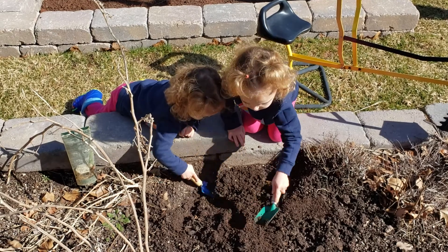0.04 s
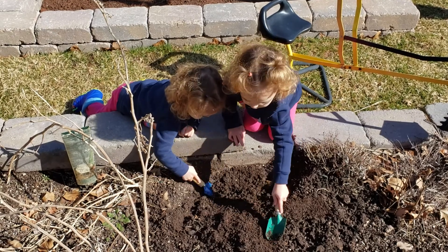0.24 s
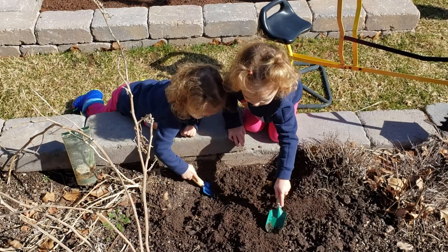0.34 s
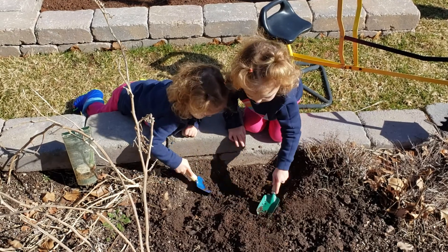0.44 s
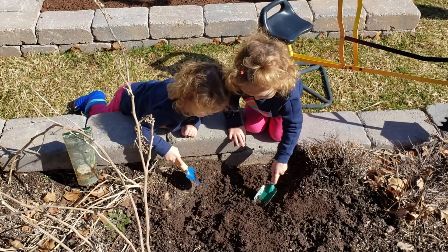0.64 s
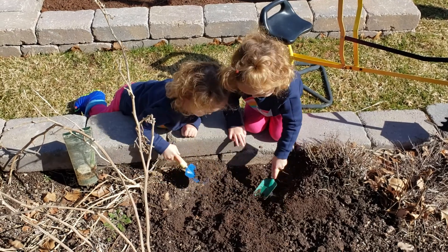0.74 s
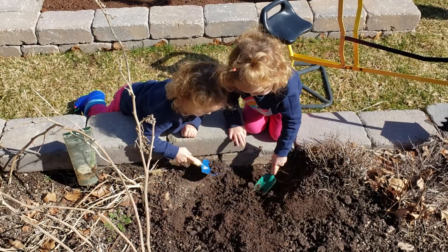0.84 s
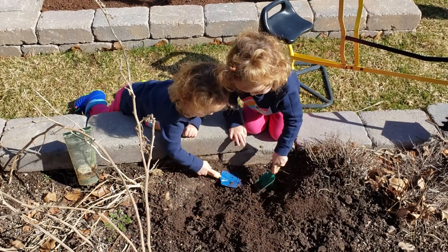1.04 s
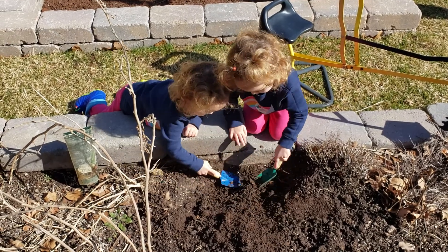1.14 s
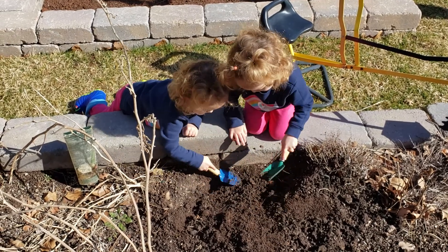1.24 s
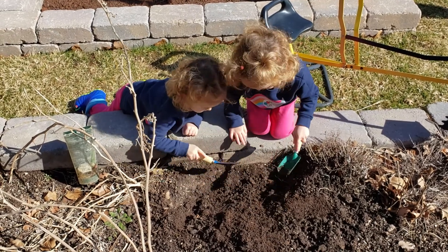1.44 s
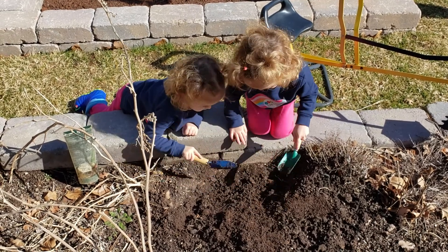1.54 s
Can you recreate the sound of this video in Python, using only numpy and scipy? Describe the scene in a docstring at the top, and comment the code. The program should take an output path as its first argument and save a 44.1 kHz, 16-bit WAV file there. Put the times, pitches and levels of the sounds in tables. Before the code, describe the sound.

In a garden bed, wind rumbles on the microphone and dry stalks hiss. Soil rustles softly, then a little trowel catches a stone with one brief click and skid as the hiss dies down.

```python
"""A garden bed on a breezy day. From the start: an outdoor wash, a faint hum, hissing dry stalks,
and wind buffeting each of two microphone ports on its own. Dry soil rustles at 0.1 and 0.4 s, eddies
slap the ports from 0.3 s on, and two crumbs drop near 0.5 s. Just before 1 s a small trowel catches
a stone: a tick, then a short skid. Meanwhile the hiss dies down with the breeze."""
import sys
import numpy as np
from scipy import signal
from scipy.fft import rfft, irfft
from scipy.io import wavfile
from scipy.ndimage import uniform_filter1d

SR = 44100
rng = np.random.default_rng(int(sys.argv[2]) if len(sys.argv) > 2 else 0)


def materialize(psi):
    """Save the field psi as 16-bit PCM at rate SR to the path in sys.argv[1].

    A 1-D psi becomes a single channel; in a 2-D psi each row is a channel.
    """
    bounded = np.clip(np.atleast_2d(psi).T, -1, 1)
    quanta = np.round(bounded * 32767).astype(np.int16)
    wavfile.write(sys.argv[1], SR, quanta)


N = 70560
TIME_S, FREQ_HZ = np.arange(N) / SR, np.fft.rfftfreq(N, 1 / SR)


def undb(db):
    """Decibels to gain."""
    return 10 ** (np.asarray(db) / 20)


def curve(points):
    """Gain over time from rows of t/s, level/dB."""
    return undb(np.interp(TIME_S, *np.array(points).T))


def colour(x, points, channel=0):
    """Filter by rows of f/Hz, level/dB; unit white noise comes out at that level per Hz."""
    rows = np.array(points, float)
    db = np.interp(np.log(np.maximum(FREQ_HZ, 1)), np.log(rows[:, 0]), rows[:, 1 + channel])
    return irfft(rfft(x) * undb(db), N) * np.sqrt(SR / 2)


def unit(x):
    """Scale to rms 1."""
    return x / np.sqrt(np.mean(x ** 2))


def noise(points):
    """Coloured noise, unrelated left and right."""
    return colour(rng.standard_normal((2, N)), points)


def decay(t, t60_s):
    """Exponential decay from time zero, silent before it."""
    return (t >= 0) * np.exp(-np.log(1000) * np.maximum(t, 0) / t60_s)


def pan(db):
    """Channel gains for a left-minus-right (L-R) level."""
    return undb(np.array([[db], [-db]]) / 2)


# Arrival at the ports: f/Hz, left lag/s, diffuse power share/0-1
PORT_ARRIVAL = [(594, 0.00038, 0.02), (1106, .00044, 0.01), (2050, 0.00049, 0.09), (6500, 0.00049, 0.3),
                (8800, 0.000534, 1)]

def far_noise(spectrum):
    """Sound from the side reaches the left port late; its treble comes from all around."""
    common, left, right = rng.standard_normal((3, N))
    hz, lags_s, shares = np.array(PORT_ARRIVAL).T
    lag_s, share = np.interp(FREQ_HZ, hz, lags_s), np.interp(FREQ_HZ, hz, shares)
    late = irfft(rfft(common) * np.exp(-2j * np.pi * FREQ_HZ * lag_s), N)
    direct, diffuse = rfft([late, common]), rfft([left, right])
    ports = irfft(np.sqrt(1 - share) * direct + np.sqrt(share) * diffuse, N)
    return np.array([colour(ports[c], spectrum, channel=c) for c in range(2)])


# Wash spectrum: f/Hz, left/(dB per Hz), right/(dB per Hz)
WASH_SPECTRUM = [(101, -103.5, -75.5), (290, -75.5, -89), (480, -86, -83.5), (577, -79.5, -75),
                 (770, -75.5, -81), (1074, -78.5, -75.5), (1240, -81, -91.5), (1570, -79, -77),
                 (1750, -82.5, -93), (1930, -75.5, -78.5), (2260, -81, -80), (2590, -80.5, -81.5),
                 (3890, -110.5, -91.5), (5400, -101, -102), (7340, -115.5, -99), (8760, -108, -110),
                 (12300, -106, -106), (15400, -114, -112)]
# Wash drift: t/s, gain/dB
WASH_GAIN = [(0, 1.5), (.7, 1), (1.0, -2), (1.2, -3), (1.45, -1), (1.6, -2)]

def wash():
    """Distant outdoor noise, nearly steady."""
    return far_noise(WASH_SPECTRUM) * curve(WASH_GAIN)


def hum(centre_hz=342.1, width_hz=37, level_db=-56.5):
    """A faint narrow band of noise, to the right."""
    peak = 1 / (1 + (2 * (FREQ_HZ - centre_hz) / width_hz) ** 2)
    band = irfft(rfft(rng.standard_normal(N)) * peak, N)
    return undb(level_db) * unit(band) * pan(-10.5)


# Stalk hiss spectrum: f/Hz, left/(dB per Hz), right/(dB per Hz)
STALK_SPECTRUM = [(900, -85.5, -82), (1930, -76.5, -81), (2860, -84, -117), (4120, -80, -90.5),
                  (5500, -88, -101), (6880, -88, -115), (8300, -105, -111), (15300, -112, -112)]
# Stalk hiss envelope: t/s, gain/dB
STALK_GAIN = [(0, -1), (.4, -3), (.78, -3), (.95, -6.5), (1.15, -10.5), (1.6, -10)]

def stalks():
    """Dry stalks hiss, dying down with the breeze."""
    return far_noise(STALK_SPECTRUM) * curve(STALK_GAIN)


# Rumble spectrum: f/Hz, relative level/dB
RUMBLE_SPECTRUM = [(15, -56), (35, -13), (60, 1), (95, -2), (130, -7), (175, -17), (240, -21), (340, -27.5),
                   (480, -36), (1000, -73)]
# Wind at the left port: t/s, level/dB
LEFT_GUSTS = [(0, -43), (.3, -44.5), (.5, -41.5), (.55, -29), (.67, -44), (.8, -32.5), (.95, -39.5),
              (1.03, -23.5), (1.08, -36), (1.12, -26.5), (1.22, -32.5), (1.325, -26.5), (1.365, -54.5),
              (1.52, -35), (1.6, -42.5)]
# Wind at the right port: t/s, level/dB
RIGHT_GUSTS = [(0, -39.5), (.17, -38), (.22, -25.5), (.27, -39), (0.309, -27.5), (.39, -31.5), (.47, -39),
               (0.591, -27.5), (.7, -46.5), (0.808, -21.5), (.86, -31), (.92, -28.5), (1.04, -27),
               (1.08, -36.5), (1.33, -47), (1.45, -36), (1.6, -39.5)]

def wind():
    """Turbulent rumble, unrelated at the two ports, evened out and then shaped into gusts."""
    rumble = unit(noise(RUMBLE_SPECTRUM))
    local_power = uniform_filter1d(rumble ** 2, size=2200)
    even = rumble / np.sqrt(local_power + 0.022)
    return even * np.array([curve(LEFT_GUSTS), curve(RIGHT_GUSTS)])


# Rustle swells: t/s, half length/s, gain/dB
SOIL_SWELLS = [(.09, 0.096, 2), (.39, 0.028, -2)]
# Rustle spectrum: f/Hz, level/(dB per Hz)
SOIL_SPECTRUM = [(4000, -108), (9000, -100), (12500, -99.5), (16000, -100)]

def soil_rustles(grain_s=0.0015, spread_db=3):
    """Dry soil rustles in brief swells of fine, grainy noise."""
    swells = sum(undb(db) * np.exp(-((TIME_S - at_s) / half_s) ** 2) for at_s, half_s, db in SOIL_SWELLS)
    grains = undb(spread_db * np.interp(TIME_S / grain_s, np.arange(N), rng.standard_normal(N)))
    return swells * grains * noise(SOIL_SPECTRUM) * pan(-2)


def swing(t, hz, half_s):
    """A short pressure swing around time zero."""
    return np.cos(2 * np.pi * hz * t) * np.exp(-(t / half_s) ** 2)


# Eddies: t/s, f/Hz, half length/s, left/dB, right/dB
EDDY_SLAPS = [(0.304, 63.7, 0.025, -54, -18.5), (0.348, 58.4, 0.029, -54, -19.5),
              (0.389, 60, 0.0107, -29, -18), (0.796, 92, 0.0075, -45, -6.5), (0.921, 65, 0.01, -29, -22),
              (0.982, 86, 0.0052, -34, -13.5), (1.149, 117, 0.0053, -17.5, -41),
              (1.249, 120, 0.0046, -22.5, -32), (1.304, 99, 0.0048, -23.5, -17.5)]

def eddies(front_db=-10):
    """Single eddies slap a port; a quicker, leading swing makes each front steep."""
    out = np.zeros((2, N))
    for at_s, hz, half_s, left_db, right_db in EDDY_SLAPS:
        t = TIME_S - at_s
        front = undb(front_db) * swing(t + 0.422 * half_s, 2.12 * hz, 0.56 * half_s)
        out += undb([[left_db], [right_db]]) * (swing(t, hz, half_s) - front)
    return out


# Crumb landings: t/s, level/dB
CRUMB_DROPS = [(0.4868, -47), (0.515, -43)]
# Crumb spectrum: f/Hz, relative level/dB
CRUMB_SPECTRUM = [(1500, -17), (4000, 0), (7000, -1), (10000, -9), (14500, -5)]

def crumbs():
    """Loose soil drops with tiny dry ticks."""
    envelope = sum(undb(db) * decay(TIME_S - at_s, t60_s=0.018) for at_s, db in CRUMB_DROPS)
    return unit(noise(CRUMB_SPECTRUM)) * envelope


# Blade contacts: t/s, ring/dB, crack/dB, L-R/dB, place (0 tip, 1 or more edge)
STONE_CONTACTS = [(0.9553, -24, -29, 1, 0.092), (0.9567, -21, -29, 8.5, 0.042),
                  (0.9783, -40, -24.5, -10.5, 4), (0.9806, -26, -27.5, 4.5, 0.79),
                  (0.9814, -23.5, -26, 0.5, 0.9)]
# Blade modes: f/Hz, tip strike/dB, edge strike/dB, t60/s, L-R/dB
BLADE_MODES = [(2016, -6.5, -0.5, 0.0088, -2), (2280, -11, -21, 0.011, -6), (2910, -32, -13.5, 0.022, -12),
               (3270, -9, -34, 0.027, -6), (3700, -25, -7.5, 0.018, 17), (3896, -6, -4.5, .036, 1.5),
               (5660, -14.5, -21, 0.023, 5), (6280, -8, -7.5, 0.0096, 6), (6567, -23, -3, 0.014, 8),
               (7080, -15, -17, 0.013, -5), (9730, -32, -5.5, 0.015, 4.5), (13500, -18, -8.5, 0.012, -14)]
# Grit crack spectrum: f/Hz, relative level/dB
GRIT_SPECTRUM = [(300, 12), (1000, 5.5), (2000, 11.5), (5000, 5), (6500, 0.5), (8000, 5), (10500, -0.5),
                 (13000, 7.5), (16000, -2)]
# Yard tail spectrum: f/Hz, level/(dB per Hz re crack)
YARD_SPECTRUM = [(1000, -66), (3500, -58), (5000, -71.5), (7000, -66), (10000, -80.5), (13000, -71),
                 (16000, -74)]

def trowel(ring_rise_s=0.00088, crack_rise_s=0.00013):
    """Each contact rings the damped blade by where it lands and cracks grit; the yard returns a tail."""
    out = np.zeros((2, N))
    for at_s, ring_db, crack_db, pan_db, place in STONE_CONTACTS:
        t, edge = TIME_S - at_s, np.clip(place, 0, 1)
        ring = np.zeros((2, N))
        for hz, tip_db, edge_db, t60_s, side_db in BLADE_MODES:
            gain = pan(side_db) * undb(tip_db + edge * (edge_db - tip_db))
            ring += gain * decay(t, t60_s) * np.sin(2 * np.pi * hz * TIME_S)
        ring *= undb(ring_db) * np.clip(t / ring_rise_s, 0, 1)
        grit = unit(noise(GRIT_SPECTRUM)) * decay(t, t60_s=0.014)
        tail = noise(YARD_SPECTRUM) * decay(t, t60_s=0.32)
        crack = undb(crack_db) * (grit + tail) * np.clip(t / crack_rise_s, 0, 1)
        out += pan(pan_db) * (ring + crack)
    return out


def scene():
    """All sources, in order of entry."""
    return wash() + hum() + stalks() + wind() + soil_rustles() + eddies() + crumbs() + trowel()


def record(dry):
    """A steep low-pass cuts the top."""
    cutoff_hz = 16100
    return signal.sosfilt(signal.ellip(10, .2, 80, cutoff_hz, fs=SR, output="sos"), dry)


dry = scene()
out = record(dry)
materialize(out)
```